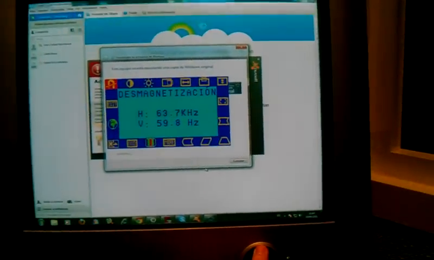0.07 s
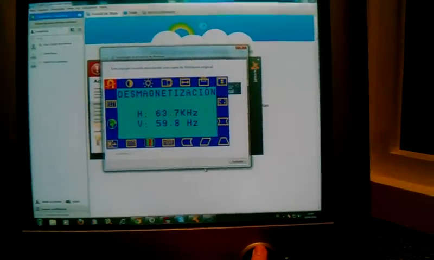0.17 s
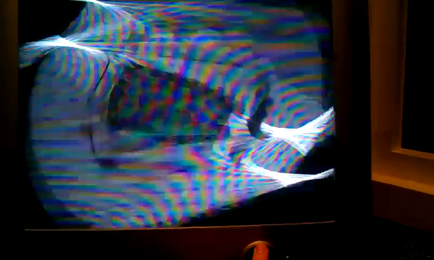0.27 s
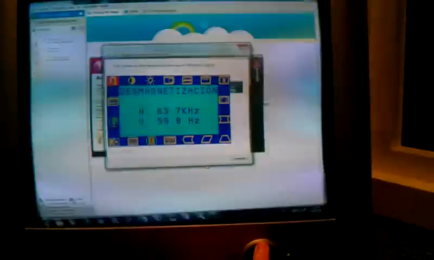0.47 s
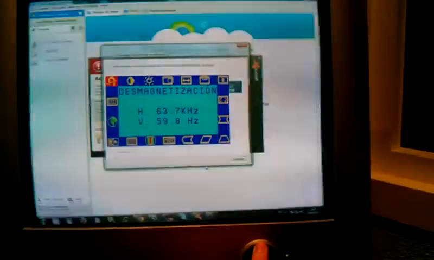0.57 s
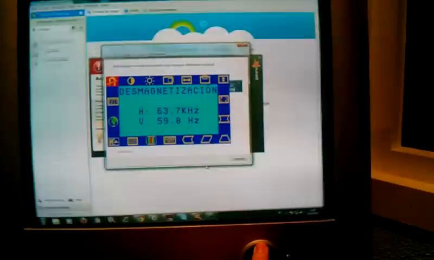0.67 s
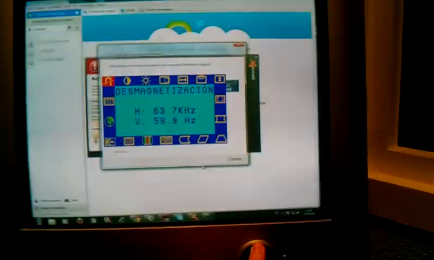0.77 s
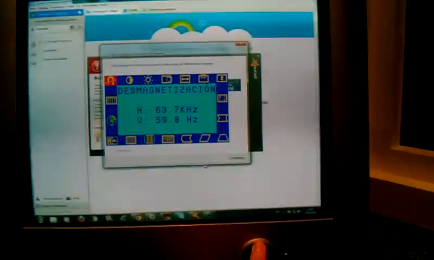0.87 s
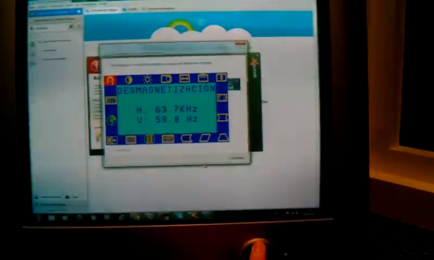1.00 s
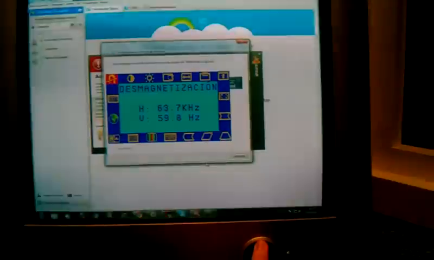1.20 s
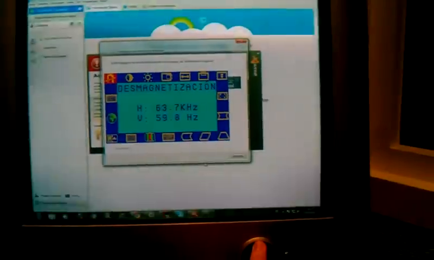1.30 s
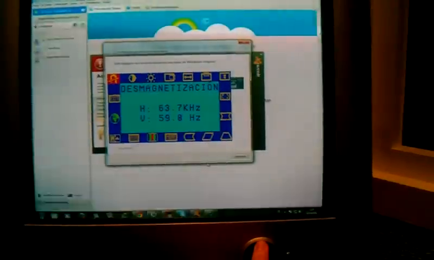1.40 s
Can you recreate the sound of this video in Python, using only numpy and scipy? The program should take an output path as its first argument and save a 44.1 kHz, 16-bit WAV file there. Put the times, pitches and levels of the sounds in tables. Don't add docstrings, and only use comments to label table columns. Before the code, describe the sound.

Quiet room hiss, then a monitor's relay snaps shut, rattling its plastic case, followed instantly by a thin metal tick; a weak coil buzz swells and dies, and a softer, woodier click ends it. Mono, slightly dull top.

```python
import sys
import numpy as np
from scipy import signal
from scipy.io import wavfile

SR = 44100
rng = np.random.default_rng(int(sys.argv[2]) if len(sys.argv) > 2 else 0)


def unload_audio(sound):
    columns = np.transpose(np.atleast_2d(sound))
    steps = np.round(np.clip(columns, -1, 1) * 32767)
    wavfile.write(sys.argv[1], SR, steps.astype(np.int16))


def boost(x):
    u = np.asarray(x, float) / 20
    return 10 ** u


N = 63945
T_S = np.arange(N) / SR
BAND_EDGES_HZ = 20 * 2 ** (np.arange(40) / 4)

# t/s, tail level/dB, crack level/dB, case ring level/dB, crack t60/s
CLICKS = [
    (.2042, -31.5, -31.5, -39, 0.0088),
    (0.25, -34, -28.5, -54.5, .015),
    (1.0504, -36, -36, -39, 0.031),
]
# delay/s, level/dB
BOUNCES = [
    [(0, -2), (.002, -1), (.0042, -0.5), (.006, -2)],
    [(0, -7), (.0007, 1), (.003, 1), (.004, -3)],
    [(0, -2), (.0018, 4), (.005, -1.5), (.0075, -8)],
]
# f/Hz, level/dB
CLOSE_COLOUR = [(250, -14.5), (530, -8.5), (1670, -4.5), (3500, -12.5), (5500, -24.5), (9660, -17),
                (12000, -55), (16000, -22)]
TICK_COLOUR = [(700, -46), (3100, -8), (5000, -9.5), (6300, -37), (8200, 1), (11000, -7), (12600, -27),
               (15000, -17)]
OPEN_COLOUR = [(250, -30), (520, -11), (940, -5), (1600, -11.5), (2500, -20.5), (4500, -27), (8000, -26),
               (16000, -43)]
# f/Hz, t60/s, closing level/dB, tick level/dB, opening level/dB
KNOCK_MODES = [(587, 0.029, -39.5, -46, -29.5), (875, 0.014, -22.5, -64, -26),
               (1710, 0.0066, -22.5, -63, -42), (2910, 0.015, -34.5, -44, -43),
               (5000, 0.0047, -36, -25, -37.5), (8510, 0.0048, -33.5, -20, -41.5),
               (10500, 0.0069, -39.5, -33, -46)]
# f/Hz, level/dB, t60/s
CASE_MODES = [(550.2, -2.5, 0.39), (621, -13.5, 0.48), (681, -11, 0.39), (815, 6, 0.23), (860, -3.5, 0.43),
              (935, 1, 0.4), (1032, -11.5, 0.49), (1229, -1, 0.5), (1237, -12, 0.25), (1432, 4, 0.08),
              (1650, -9, 0.24), (1877, 3, 0.16), (2222, -3.5, 0.085), (2770, -13, .1)]
# f/Hz, level/dB, t60/s
METAL_MODES = [(3100, -3.5, 0.32), (5210, -5, 0.19), (8050, -12, 0.22), (8040, -1, 0.33), (7960, 4, 0.29),
               (8700, -1, .2), (9600, -14, 0.092)]
# f/Hz, t60/s
ROOM_T60 = [(300, 0.32), (700, 0.66), (1500, 0.55), (3000, 0.4), (6000, 0.41), (9000, 0.33), (14000, 0.13)]
# multiple of COIL_HZ, level/dB, swell start t/s, time to peak/s
HUM = [(1, -69.5, .26, 0.042), (2, -58, 0.21, 0.15), (3, -61.5, 0.315, 0.068), (3.45, -65.5, 0.25, 0.12),
       (4, -58.5, 0.232, 0.055), (5.04, -52.5, .26, 0.083), (6, -63, 0.267, 0.088), (7, -60, 0.33, 0.051),
       (9, -59.5, 0.2, 0.12), (12, -64.5, 0.25, 0.09)]
# f/Hz, level/dB
FLOOR = [(20, -4.5), (60, -8), (170, -8), (300, -7.5), (950, -11.5), (1500, -16.5), (6000, -22.5),
         (16000, -22.5)]
# f/Hz, width/Hz, level/dB
DRONES = [(119.46, 2.6, -73.5), (144.4, 1, -76), (221.4, 7.5, -69), (349.3, 5.6, -83.5), (501.5, 19, -79.5),
          (631, 7.8, -76)]
# f/Hz, width/Hz, level/dB
TONE_PEAKS = [(4230, 290, -1.5), (6200, 1500, -1.5), (8200, 3000, 4.5), (12240, 1700, -8), (15300, 1100, -7)]

METAL_DB, KNOCK_DB = -38.5, 4
OPEN_TILT_DB_PER_OCTAVE = -7
CASE_LOW_CUT_HZ = 426
ROOM_BUILD_S = 0.0044
COIL_HZ = 100.85
HUM_WAVER_DB, HUM_WAVER_HZ, HUM_SHARPNESS = 3.5, 6.7, 3.5
FLOOR_DB, FLOOR_PATCHY_DB, FLOOR_PATCHY_HZ = -60.5, 1.47, 3.6
CUTOFF_HZ = 15900


def rms_one(x):
    return x / np.sqrt(np.mean(x ** 2) + 1e-20)


def at_hz(points, hz):
    table_hz, values = np.array(points).T
    return np.interp(np.log(hz), np.log(table_hz), values)


def drift(rate_hz):
    r = np.exp(-80 * np.pi * rate_hz / SR)
    noise = rng.standard_normal(N // 40 + 2002)
    slow = signal.lfilter([1], [1, -2 * r, r * r], noise)[2000:]
    return np.interp(np.arange(N) / 40, np.arange(len(slow)), rms_one(slow))


def ring(hits, hz, t60_s):
    r, w = boost(-60 / (t60_s * SR)), 2 * np.pi * hz / SR
    return signal.lfilter([0, np.sin(w)], [1, -2 * r * np.cos(w), r * r], hits + 1e-18)


def dying(age_s, t60_s):
    return (age_s >= 0) * boost(-60 * np.maximum(age_s, 0) / t60_s)


def bank():
    bands = []
    for low, high in zip(BAND_EDGES_HZ, BAND_EDGES_HZ[1:]):
        sos = signal.butter(2, [low, high], "band", fs=SR, output="sos")
        bands.append((sos, np.sqrt(low * high)))
    return bands


def relay():
    out = struck(METAL_MODES, CLICKS[1][0], BOUNCES[1], METAL_DB, 0)
    colours = CLOSE_COLOUR, TICK_COLOUR, OPEN_COLOUR
    tilts_db = 0, 0, OPEN_TILT_DB_PER_OCTAVE
    for k, (row, bounces, colour, tilt_db) in enumerate(zip(CLICKS, BOUNCES, colours, tilts_db)):
        start_s, case_db = row[0], row[3]
        knock_modes = [(hz, levels_db[k], t60_s) for hz, t60_s, *levels_db in KNOCK_MODES]
        out = out + click(row, bounces, colour)
        out = out + struck(CASE_MODES, start_s, bounces, case_db, tilt_db)
        out = out + struck(knock_modes, start_s, bounces, KNOCK_DB, 0)
    low_cut = signal.butter(4, CASE_LOW_CUT_HZ, "high", fs=SR, output="sos")
    return signal.sosfilt(low_cut, out)


def click(row, bounces, colour):
    start_s, tail_db, crack_db, _, crack_t60_s = row
    age_s = T_S - start_s
    white, bands = rng.standard_normal((2, N)), bank()
    bounce_t60_s = max(crack_t60_s, .002) / 4
    crack = boost(crack_db) * sum(boost(db) * dying(age_s - lag_s, bounce_t60_s) for lag_s, db in bounces)
    crack = crack + boost(crack_db - 3) * dying(age_s, crack_t60_s)
    build = 1 - np.exp(-np.maximum(age_s, 0) / ROOM_BUILD_S)
    out, power = 0, 0
    for k, (sos, hz) in enumerate(bands):
        gain = boost(at_hz(colour, hz))
        power += gain ** 2 * hz * .35 / SR
        if hz > 200:
            tail = boost(tail_db) * build * dying(age_s, at_hz(ROOM_T60, hz))
            out = out + gain * signal.sosfilt(sos, 1e-18 + white[k % 2] * (crack + tail))
    return out / np.sqrt(power)


def struck(modes, start_s, bounces, level_db, tilt_db):
    out = 0
    for hz, db, t60_s in modes:
        hits = np.zeros(N)
        mode_db = level_db + db - 6.5 + tilt_db * np.log2(hz / 1000)
        for lag_s, hit_db in bounces:
            strength = boost(mode_db + hit_db + rng.normal(0, 2.3))
            hits[int((start_s + lag_s) * SR)] = strength * rng.choice([-1, 1])
        out = out + ring(hits, hz, t60_s)
    return out


def coil():
    out = 0
    for multiple, db, start_s, rise_s in HUM:
        x = np.maximum(T_S - start_s, 0) / rise_s
        swell = (x * np.exp(1 - x)) ** HUM_SHARPNESS
        level = np.sqrt(2) * boost(db + HUM_WAVER_DB * drift(HUM_WAVER_HZ))
        phase = 2 * np.pi * (multiple * COIL_HZ * T_S + rng.random())
        out = out + level * swell * np.sin(phase)
    return out


def room_tone():
    white = rng.standard_normal((2, 2 * N))
    hiss, drones = 0, 0
    for k, (sos, hz) in enumerate(bank()):
        level = boost(at_hz(FLOOR, hz) + FLOOR_PATCHY_DB * drift(FLOOR_PATCHY_HZ))
        hiss = hiss + level * signal.sosfilt(sos, white[k % 2])[N:]
    for hz, width_hz, db in DRONES:
        drone = ring(rng.standard_normal(2 * N), hz, 1.9 / width_hz)[N:]
        drones = drones + boost(db) * rms_one(drone)
    return boost(FLOOR_DB) * rms_one(hiss) + drones


def scene():
    return (relay() + coil() + room_tone())[None]


def band_limit(x):
    return signal.sosfilt(signal.butter(12, 16500, fs=SR, output="sos"), x)


def record(dry):
    for hz, width_hz, db in TONE_PEAKS:
        a, w = boost(db / 2), 2 * np.pi * hz / SR
        q = np.sin(w) * width_hz / hz / 2
        middle = -2 * np.cos(w)
        dry = signal.lfilter([1 + q * a, middle, 1 - q * a], [1 + q / a, middle, 1 - q / a], dry)
    top_cut = signal.ellip(8, .5, 28, CUTOFF_HZ, fs=SR, output="sos")
    mix = signal.sosfilt(top_cut, dry)
    return band_limit(mix)


dry = scene()
out = record(dry)
unload_audio(out)
```